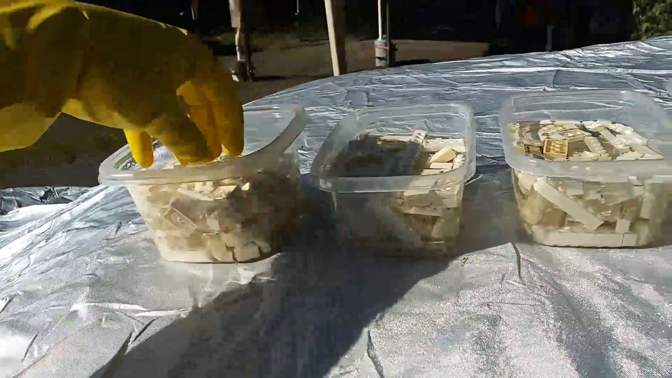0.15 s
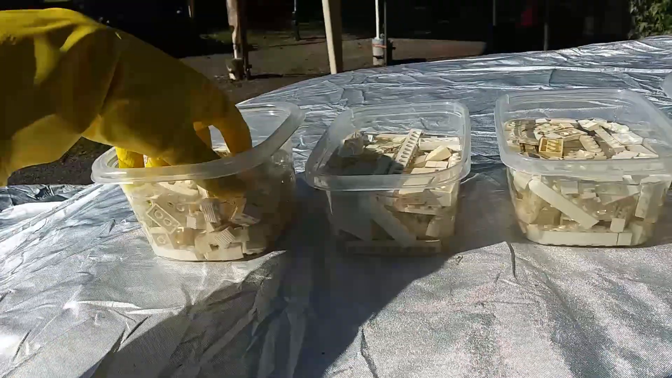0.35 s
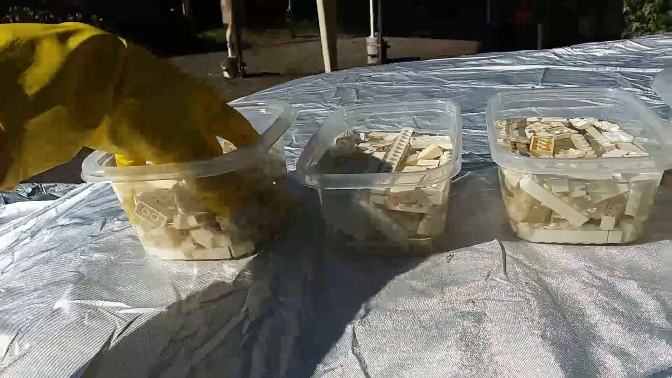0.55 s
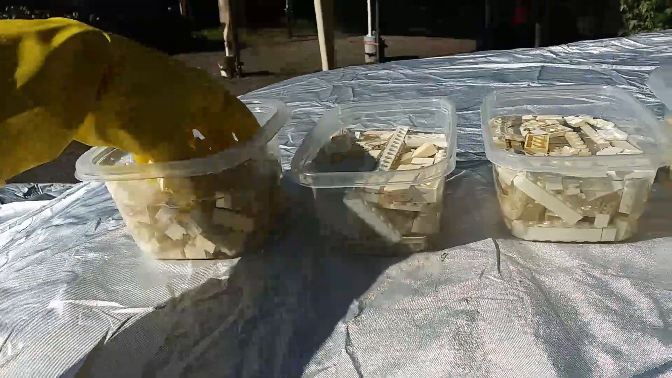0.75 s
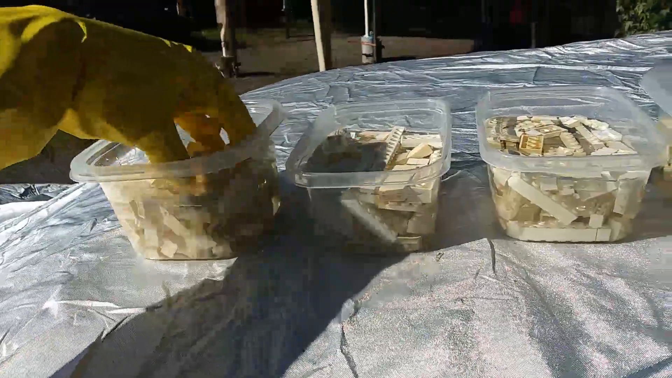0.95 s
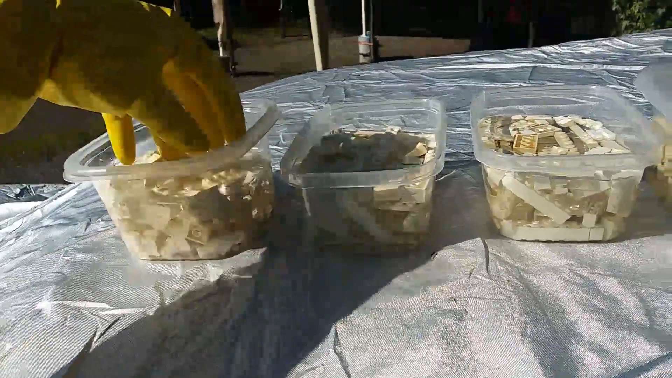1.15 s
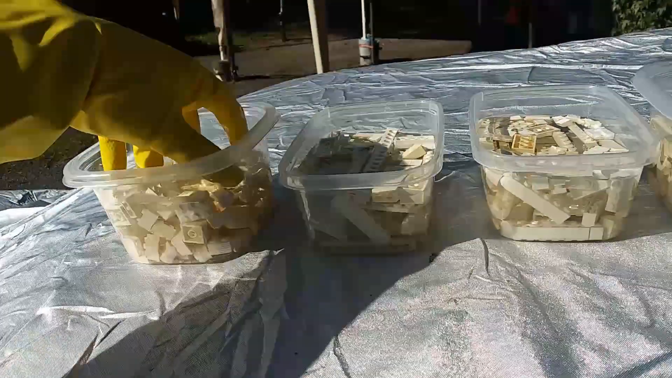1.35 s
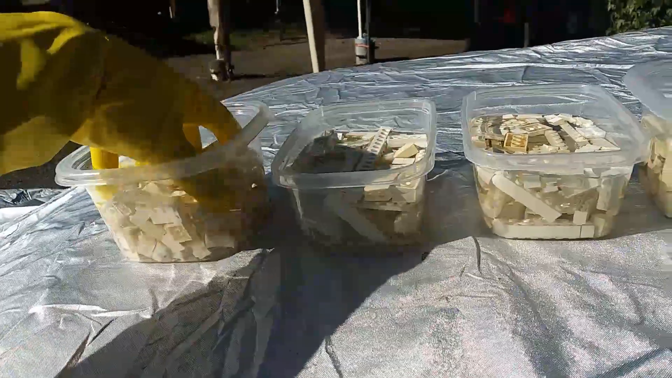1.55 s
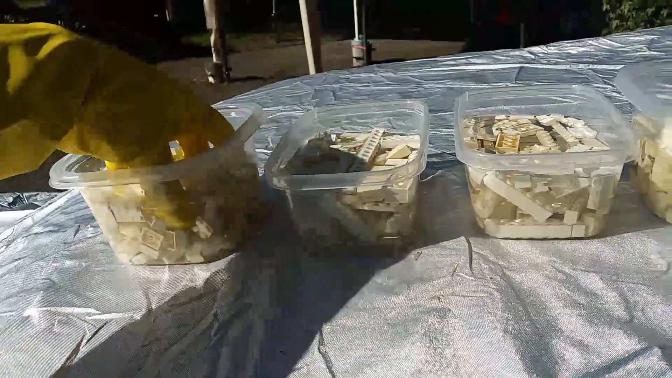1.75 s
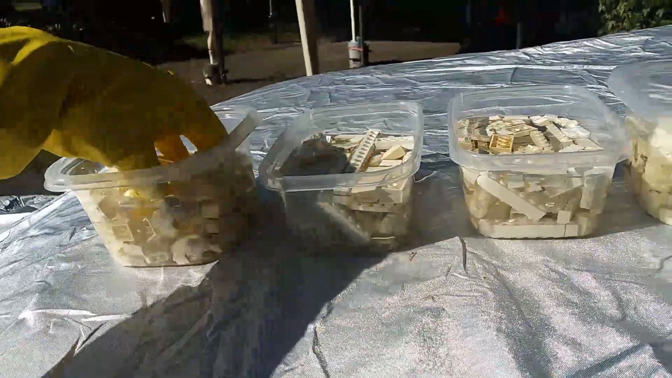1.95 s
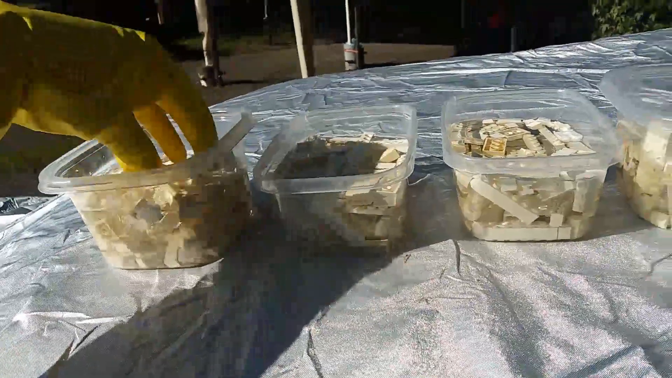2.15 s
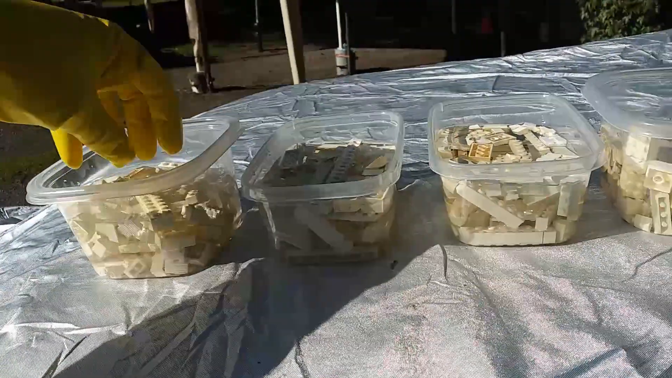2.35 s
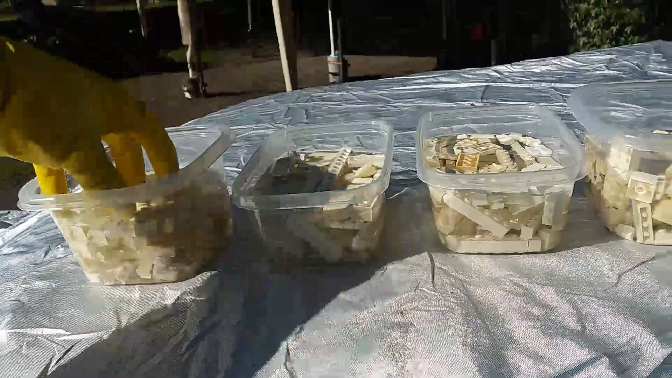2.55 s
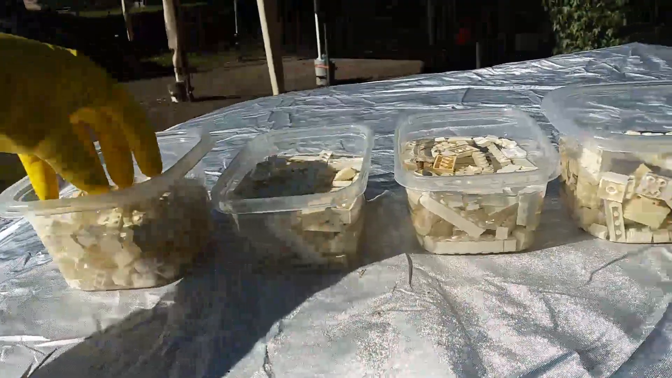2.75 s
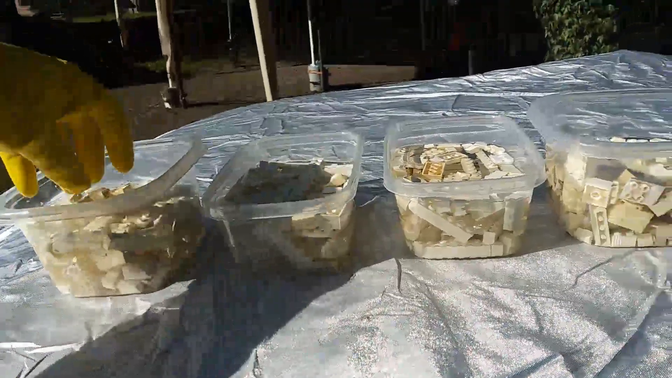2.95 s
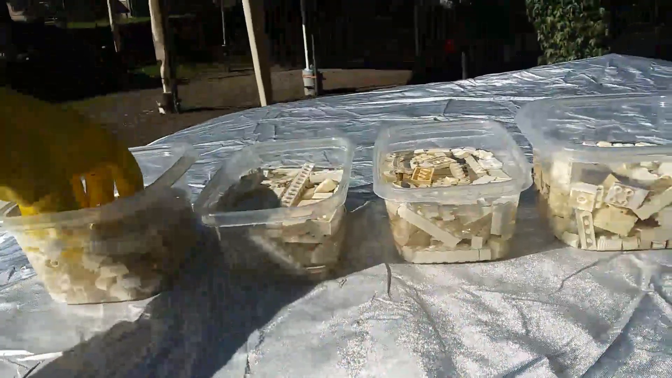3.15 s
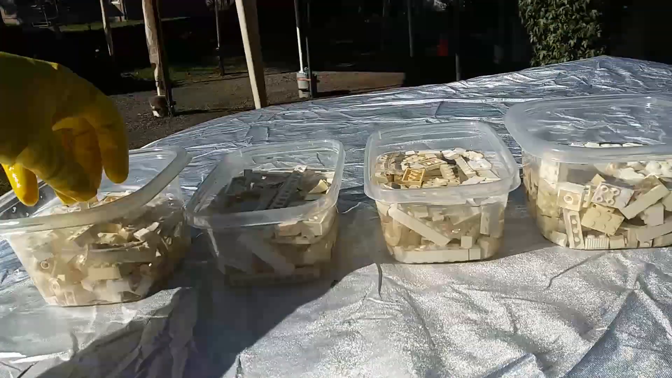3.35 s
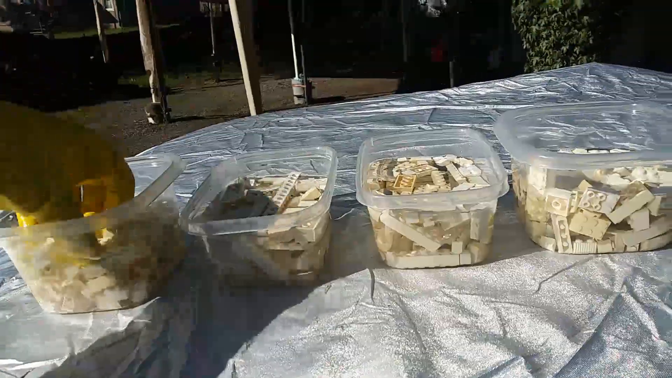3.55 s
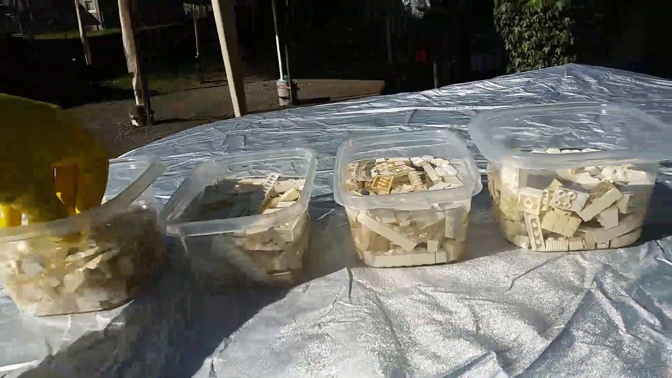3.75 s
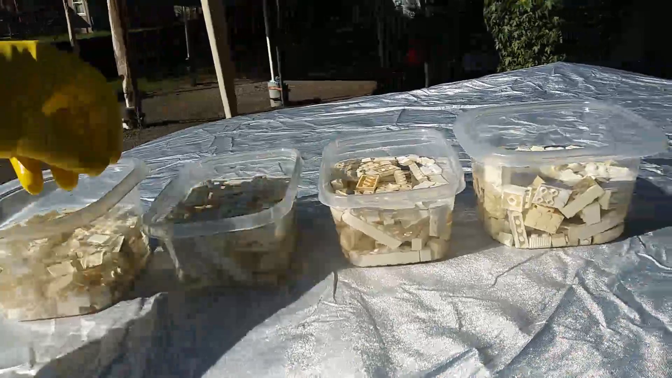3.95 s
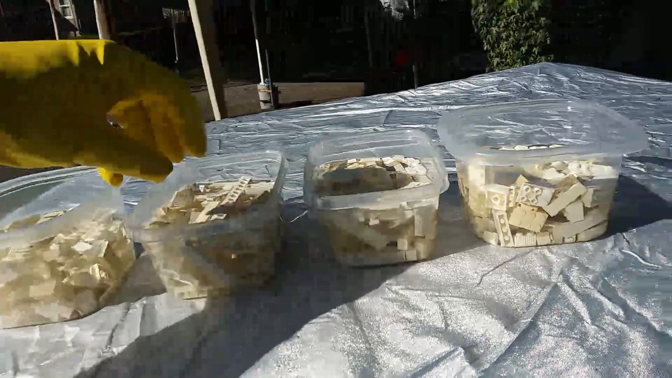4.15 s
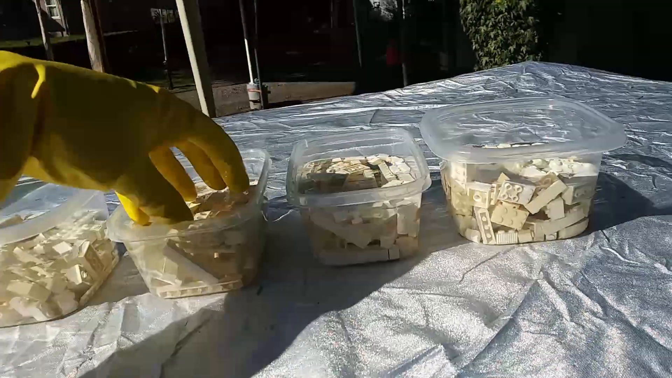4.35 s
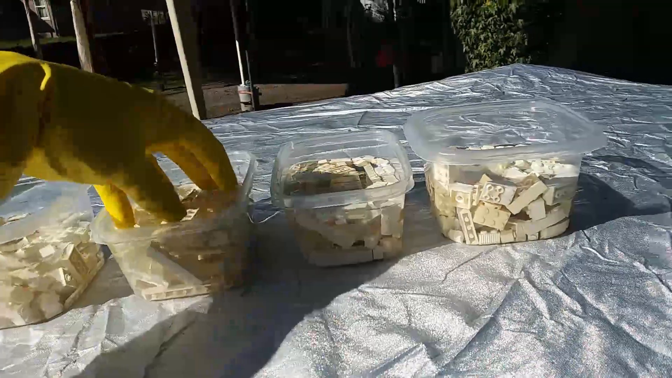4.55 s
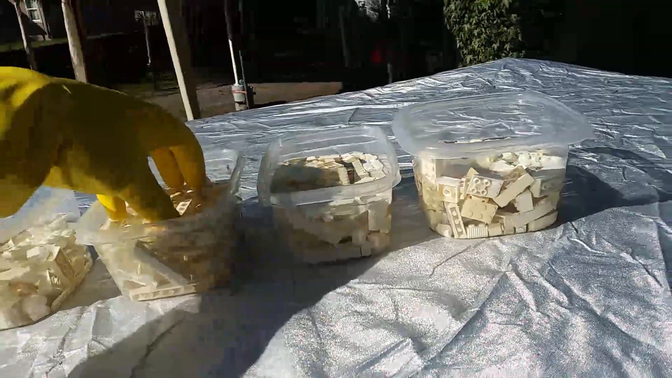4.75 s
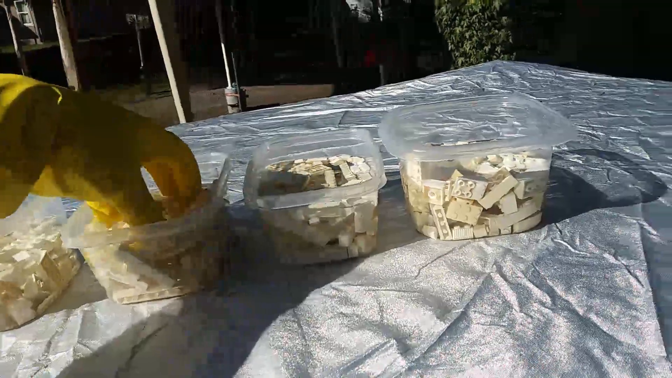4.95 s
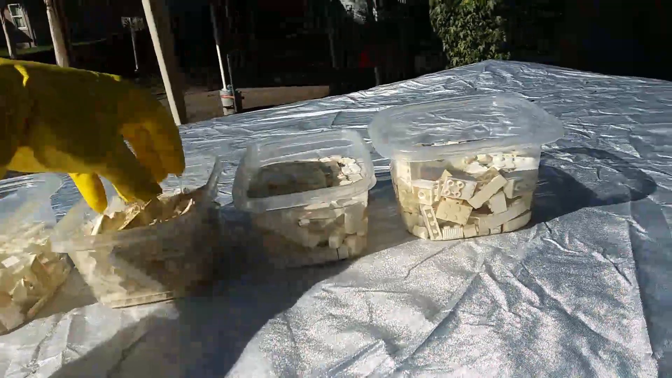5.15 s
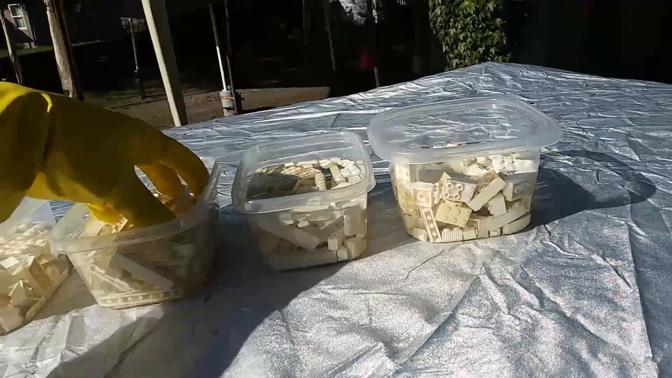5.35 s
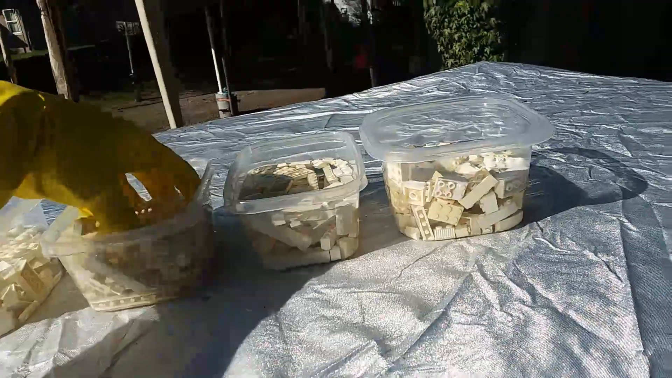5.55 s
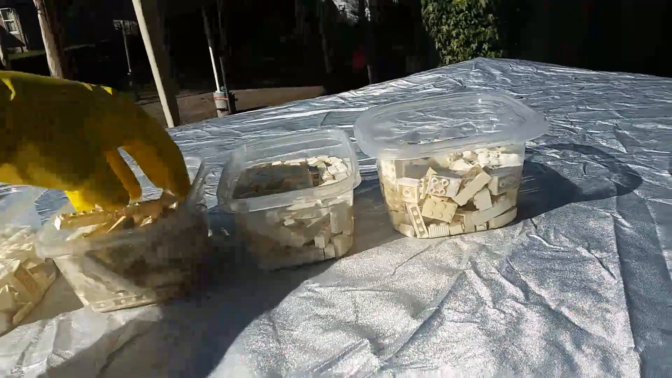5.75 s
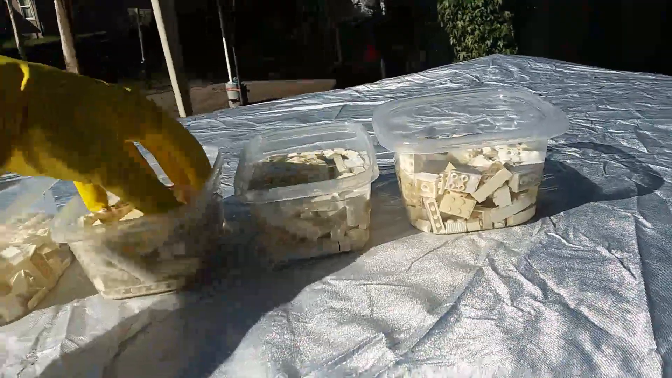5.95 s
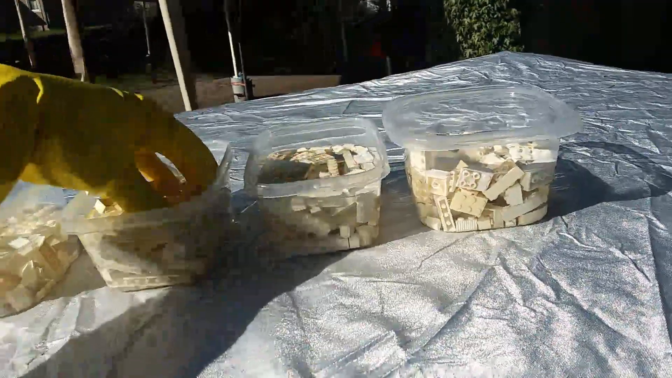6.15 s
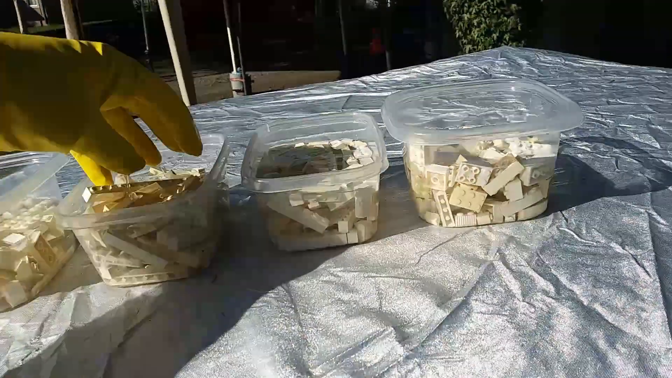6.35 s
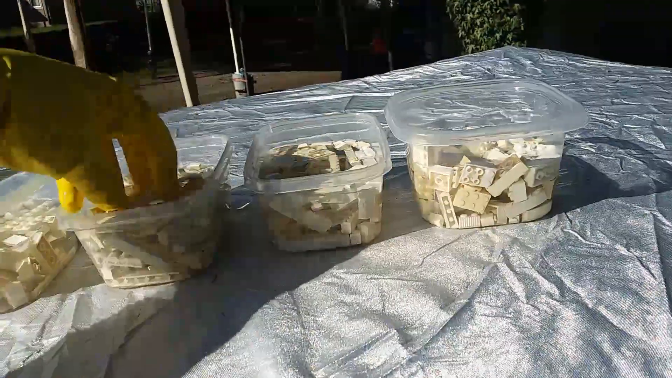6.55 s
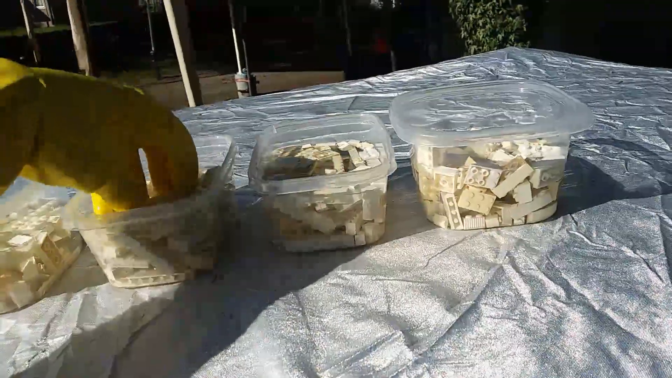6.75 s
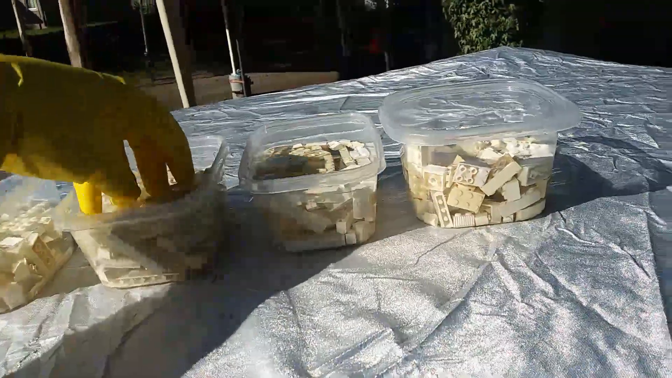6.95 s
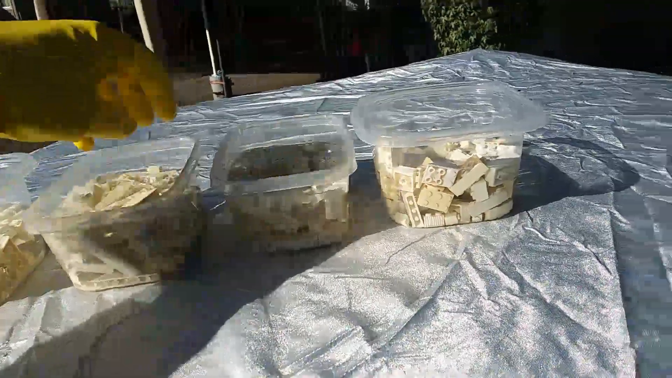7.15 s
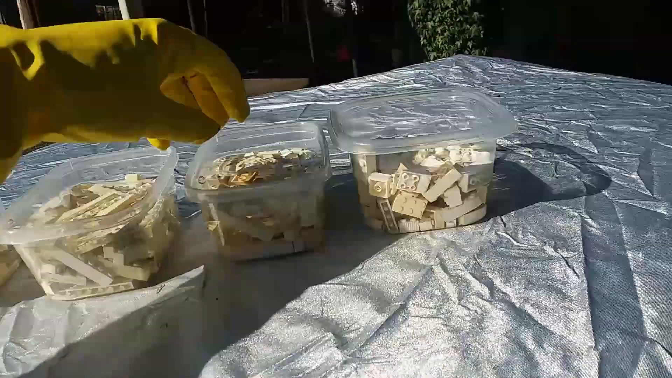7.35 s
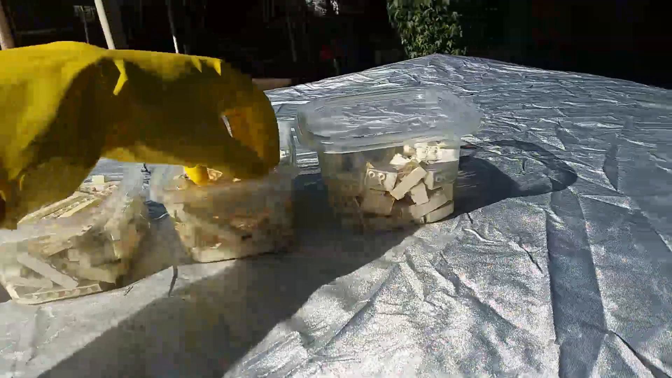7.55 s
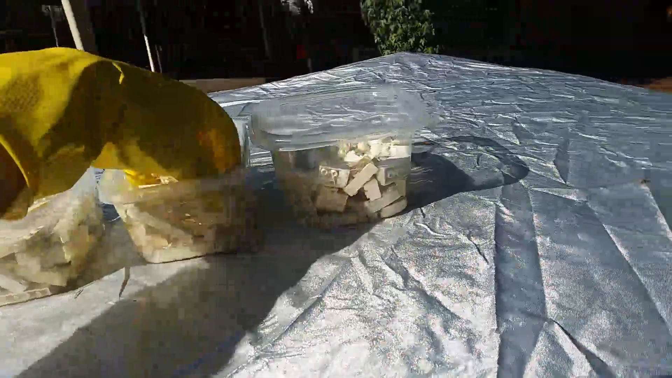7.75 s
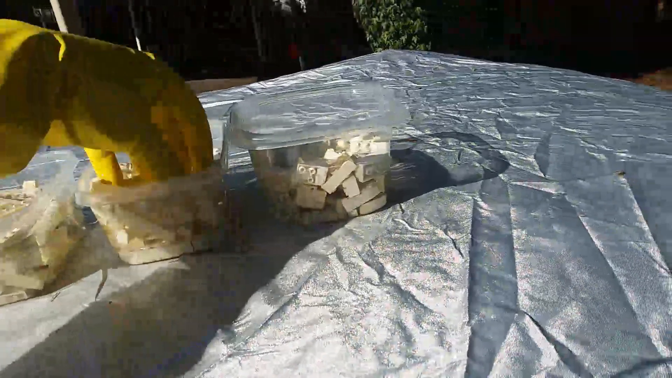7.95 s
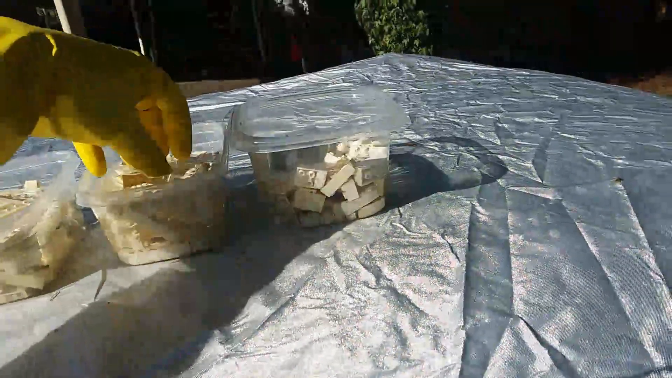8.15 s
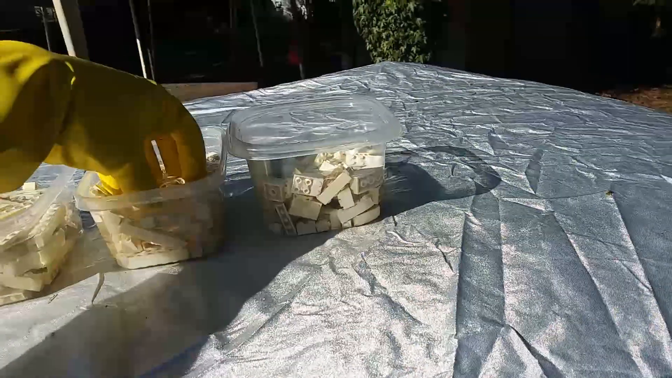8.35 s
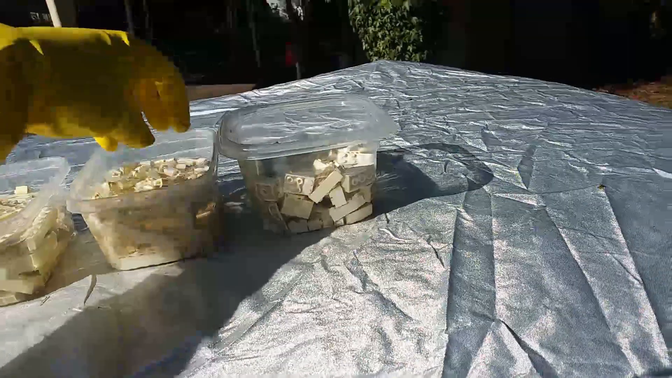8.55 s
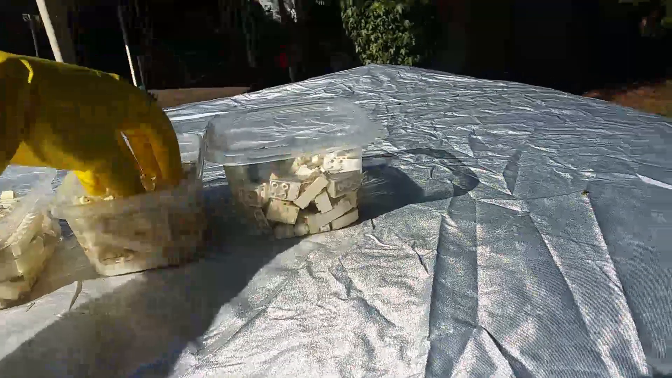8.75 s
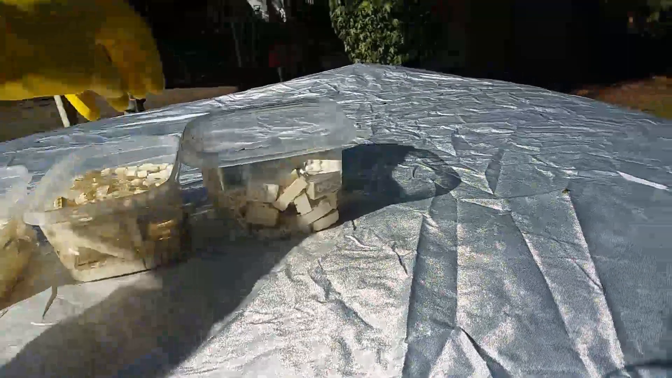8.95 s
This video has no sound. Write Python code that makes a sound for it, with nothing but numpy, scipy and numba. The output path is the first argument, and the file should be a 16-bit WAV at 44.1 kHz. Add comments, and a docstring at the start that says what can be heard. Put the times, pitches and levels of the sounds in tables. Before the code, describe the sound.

Outdoors, a close microphone picks up plastic bricks churning and knocking in a tub of liquid as a gloved hand presses them down again and again. Bubbles gurgle and trapped air spits between the pieces. The stirring stops for a moment of dripping and a barely audible distant bird, then resumes with a crisper clatter. After a second short lull with faint thin tones come the last pushes and a light swish of the sleeve.

```python
"""A table outdoors, a small microphone close to thin plastic tubs; far behind, a faint machine hum.
A rubber-gloved hand pushes small plastic bricks under the liquid: each push is a dense, damped clatter
with a few hard knocks, while bubbles gurgle, froth fizzes and trapped air spits out between the bricks.
Near 4 s the glove lifts, liquid drips and trickles back, and a far bird chirps. Crisper pushes follow in
another tub. Thin tones hang in the last pause, after 7 s; a few more pushes, and the sleeve swishes."""
import sys
import numpy as np
from scipy import signal
from scipy.fft import rfft, irfft
from scipy.io import wavfile
from scipy.ndimage import uniform_filter1d
from numba import njit

SR = 44100
rng = np.random.default_rng(int(sys.argv[2]) if len(sys.argv) > 2 else 0)


def file_out(sig):
    """Save sig as 16-bit WAV at sys.argv[1]."""
    # one column per channel
    cols = np.atleast_2d(sig).T
    # limit, then scale
    lim = np.clip(cols, -1, 1)
    pcm = np.round(lim * 32767).astype(np.int16)
    wavfile.write(sys.argv[1], SR, pcm)


N = 397334

# Single hard knocks of brick on brick or tub.
# Each row: start in seconds, peak in dB, main ring in Hz, hardness of the edge in dB.
KNOCKS = [(0.1, -25.5, 1213, -7), (0.192, -29, 1140, -20), (0.207, -23, 1090, -17.5),
          (0.232, -17, 1144, -17), (0.301, -22.5, 800, -22), (0.372, -27, 970, -12),
          (0.431, -23, 775, -13.5), (0.586, -19.5, 1040, -10), (0.668, -22.5, 1014, -17),
          (0.696, -22, 1186, -16), (0.952, -22.5, 1060, -10), (1.007, -23, 1224, -15.5),
          (1.038, -22.5, 1040, -10), (1.11, -26, 1045, -12), (1.173, -24, 1110, -3), (1.35, -19, 1090, -35),
          (1.36, -16.5, 946, -12), (1.399, -19, 890, -16), (1.517, -24, 905, -14), (1.543, -25.5, 925, -25),
          (1.589, -19, 840, -14), (1.629, -18, 1150, -6), (1.722, -20, 1180, -30), (1.794, -22, 1120, -14),
          (1.851, -19, 1360, -16.5), (1.863, -23, 1010, -6), (1.996, -22, 754, -14),
          (2.077, -25, 807, -15.5), (2.145, -21.5, 1100, -17), (2.219, -24.5, 1116, -17),
          (2.325, -37, 762, -17), (2.395, -43, 1130, -25), (2.474, -29, 1160, 2),
          (2.535, -17.5, 980, -16.5), (2.572, -21.5, 990, -16.5), (2.722, -28, 807, -22),
          (2.78, -28.5, 1070, -20), (2.889, -34, 1110, -23), (2.974, -25.5, 836, -18.5),
          (3.004, -17.5, 1160, -15), (3.035, -15.5, 854, -18), (3.051, -13.5, 973, -14.5),
          (3.059, -17.5, 707, -14), (3.199, -30, 1070, -17), (3.221, -30.5, 826, -13),
          (3.245, -29.5, 856, -18), (3.358, -32, 990, -23), (3.421, -24, 547, -13), (3.45, -21, 900, -26),
          (3.462, -16.5, 1030, -8), (3.482, -16, 977, -14), (3.498, -13, 974, -7),
          (3.522, -16.5, 1145, -14), (3.531, -17.5, 1020, -3), (3.623, -28, 1010, -9),
          (3.672, -27.5, 910, -16.5), (3.733, -32.5, 780, -16), (3.786, -32.5, 845, -18),
          (3.843, -36.5, 940, -15.5), (3.892, -33.5, 784, -28), (3.929, -38, 950, -24),
          (4.043, -38, 883, -28), (4.394, -46, 1070, -10), (4.461, -41, 746, -1), (4.706, -35, 764, -8),
          (4.731, -19, 868, -13.5), (4.754, -19, 1296, -7), (4.786, -21, 726, -2), (4.829, -25, 760, -16),
          (4.88, -21, 513, -15), (4.959, -27, 900, -11), (4.965, -20.5, 2490, -5),
          (4.989, -24.5, 533, -14.5), (5.054, -26, 1190, -10), (5.088, -21.5, 1260, -7),
          (5.128, -24, 704, -27.5), (5.254, -25, 1140, -12), (5.261, -15, 1220, -8),
          (5.296, -21, 1300, -10), (5.317, -19.5, 1155, -10), (5.417, -24, 845, -17),
          (5.491, -19, 965, -18), (5.521, -13, 1090, 0), (5.539, -16, 1110, -15.5),
          (5.624, -19.5, 870, -11), (5.82, -30.5, 943, -24), (5.908, -22.5, 900, -5),
          (5.955, -19, 860, -10), (6.013, -21, 950, -13), (6.091, -24.5, 960, -10), (6.154, -32, 880, -15),
          (6.193, -24.5, 860, -15), (6.251, -34, 900, -31), (6.359, -31.5, 970, -22),
          (6.515, -15.5, 913, -15.5), (6.535, -17.5, 820, -1), (6.603, -18.5, 950, -4),
          (6.681, -25.5, 915, -16), (6.739, -27, 935, -22), (6.863, -33.5, 1330, -14),
          (6.877, -32, 990, -11), (6.929, -36, 1150, -16), (7.009, -38, 815, -26), (7.572, -23.5, 1324, -7),
          (7.589, -21.5, 754, -20), (7.672, -22.5, 1090, -15), (7.73, -27, 1080, -20),
          (7.759, -26, 1040, -22), (7.861, -26, 770, -21), (7.95, -22, 1060, -12), (8.213, -21, 1466, -13),
          (8.244, -24.5, 780, -6), (8.29, -24.5, 950, -8), (8.528, -45, 1464, -18), (8.663, -22, 1013, -14),
          (8.677, -24.5, 1105, -22), (8.956, -38.5, 1980, -9), (8.998, -39, 1510, -10)]


def from_db(db):
    """Decibels to amplitude."""
    return 10 ** (np.asarray(db) / 20)


def rms_one(x):
    """The signal scaled to rms 1."""
    return x / np.sqrt(np.mean(x ** 2) + 1e-20)


def in_time(rows):
    """Each column of a curve at every sample; the first column is seconds."""
    s, *columns = np.transpose(rows)
    return [np.interp(np.arange(N) / SR, np.maximum.accumulate(s), c) for c in columns]


def add(out, s, sound):
    """Mix a short sound in at s seconds."""
    start = int(np.clip(round(s * SR), 0, N - 1))
    out[start:start + len(sound)] += sound[:N - start]


def drift(per_s):
    """A random wander of rms 1, turning per_s times a second."""
    knots = rng.standard_normal(N // 20)
    return rms_one(np.interp(np.arange(N) / SR * per_s, np.arange(len(knots)), knots))


def band(x, low_hz, high_hz, order=3):
    """Band-pass filter."""
    edges_hz = [low_hz, min(high_hz, SR / 2 - 100)]
    return signal.sosfilt(signal.butter(order, edges_hz, "band", fs=SR, output="sos"), x)


def narrow_noise(hz, width_hz):
    """A wavering tone: noise in a narrow band, rms 1."""
    return rms_one(band(rng.standard_normal(N), hz - width_hz / 2, hz + width_hz / 2, order=2))


def response(spectrum, lifts=(), size=4096):
    """Causal (minimum-phase) impulse response of a spectrum with resonant lifts."""
    hz = np.maximum(np.fft.rfftfreq(size, 1 / SR), 1)
    points = np.array(spectrum)
    db = np.interp(np.log(hz), np.log(points[:, 0]), points[:, 1])
    db = db + sum(lift * np.exp(-((hz - centre) / width) ** 2) for centre, width, lift in lifts)
    cepstrum = irfft(np.log(from_db(db)))
    cepstrum[1:size // 2] *= 2
    cepstrum[size // 2 + 1:] = 0
    return irfft(np.exp(rfft(cepstrum)))


def through(x, impulse):
    """Pass a sound through an impulse response, keeping its length."""
    return signal.oaconvolve(x, impulse)[:len(x)]


def evened(x, span_s):
    """Level near 1 over each span; the grain inside it stays."""
    size = int(span_s * SR)
    power = uniform_filter1d(uniform_filter1d(x ** 2, size), size)
    return x / np.sqrt(np.abs(power) + np.mean(x ** 2) / 1000)


def contacts(per_s, spread_db):
    """Random clicks, most of them small and a few large."""
    sizes = from_db(spread_db * np.minimum(rng.exponential(1, N), 4))
    return sizes * (rng.random(N) < per_s / SR)


@njit
def damped_modes(starts, turn, keep, height, length):
    """Sum of decaying sines, each given by start sample, radians and decay per sample, and height."""
    out = np.zeros(length)
    for k in range(len(starts)):
        spring, loss = 2 * keep[k] * np.cos(turn[k]), keep[k] * keep[k]
        before, now = 0.0, height[k] * np.sin(turn[k])
        for i in range(starts[k], min(length, starts[k] + int(5 / (1 - keep[k])))):
            out[i] += now
            before, now = now, spring * now - loss * before
    return out


def still_air(level_db=-66):
    """The garden's steady bed of soft, low noise."""
    # Colour of the air. Each row: frequency in Hz, level in dB.
    colour = [(25, -46), (85, -28), (140, -6), (200, -3.5), (255, -6), (330, -9), (520, -17), (850, -23.5),
              (1100, -20), (1600, -11), (2700, -30), (4800, -34), (6500, -43), (12000, -42), (15000, -52)]
    return from_db(level_db) * rms_one(through(rng.standard_normal(N), response(colour)))


def far_machine(waver_db=0.5):
    """A distant machine hums in narrow, low bands, swelling and fading."""
    # Bands of the hum. Each row: centre in Hz, width in Hz, level in dB.
    hum_bands = [(120.7, 5.1, -84), (182, 33, -79.5), (248.4, 56, -67.5)]
    # Swell of the hum. Each row: time in seconds, gain in dB.
    swell = [(0, 2.5), (4.3, -0.5), (4.6, 5), (7.3, 5), (8.7, -0.5), (8.85, -1)]
    gain = from_db(in_time(swell)[0] + waver_db * drift(7))
    return gain * sum(from_db(db) * narrow_noise(hz, width) for hz, width, db in hum_bands)


def far_bird(waver_hz=190):
    """A small bird, well off the microphone: short, high whistles that waver as they fall."""
    # The calls. Each row: start and length in seconds, first and last pitch in Hz, peak in dB.
    chirps = [(4.423, .022, 7300, 6250, -76), (4.46, 0.043, 6600, 6300, -73),
              (4.576, 0.043, 7060, 6700, -76), (4.642, 0.05, 6730, 6370, -73)]
    out = np.zeros(N)
    waver = waver_hz * drift(700)
    for s, length, start_hz, end_hz, db in chirps:
        size = int(length * SR)
        glide = np.linspace(start_hz, end_hz, size) + waver[int(s * SR):][:size]
        add(out, s, from_db(db) * np.hanning(size) * np.sin(2 * np.pi * np.cumsum(glide) / SR))
    return out


def thin_tones(fade_s=0.036, skirt_db=-7.0, skirt_ratio=3.1):
    """Faint, rough whistles that waver in a narrow band and fade in and out."""
    # The whistles. Each row: start and end in seconds, pitch and width in Hz, level in dB.
    tones = [(7.13, 7.535, 4345, 100, -72.5), (7.04, 7.51, 1825, 106, -64), (6.5, 7.42, 2255, 35, -78)]
    out, t = np.zeros(N), np.arange(N) / SR
    for start, end, hz, width_hz, db in tones:
        fade = np.clip(np.minimum(t - start, end - t) / fade_s, 0, 1)
        core = narrow_noise(hz, width_hz)
        skirt = from_db(skirt_db) * narrow_noise(hz, skirt_ratio * width_hz)
        out += from_db(db) * fade * (core + skirt)
    return out


def table_echo(x, t60=0.17, wet_db=-13.0, dull_hz=3800, size=10000):
    """The direct sound plus the short, dull tail thrown back by the table and neighbouring tubs."""
    t = np.arange(size) / SR
    decay = from_db(-60 * t / t60) * (t > .003)
    tail = band(rng.standard_normal(size) * decay, 200, dull_hz, order=2)
    return x + from_db(wet_db) * through(x, tail / np.linalg.norm(tail) * np.sqrt(2 * dull_hz / SR))


def swishes(low_hz=1050, high_hz=4600, tilt_hz=1800):
    """Glove and sleeve rub softly as the arm moves away."""
    # Arm movements. Each row: middle and half length in seconds, level in dB.
    moves = [(4.484, 0.042, -68), (8.923, 0.11, -50.5)]
    t = np.arange(N) / SR
    rub = band(rng.standard_normal(N), low_hz, high_hz, order=8)
    rub = signal.sosfilt(signal.butter(1, tilt_hz, fs=SR, output="sos"), rub)
    return rms_one(rub) * sum(from_db(db) * np.exp(-((t - s) / half) ** 2) for s, half, db in moves)


def fizz(level_db, pops_per_s=2600, spread_db=6.5, pop_s=0.0008, clump_db=4.0, size=400):
    """Froth crackles as the bricks churn it: each tiny bubble bursts in about a millisecond."""
    # Colour of the bursting froth. Each row: frequency in Hz, level in dB.
    colour = [(2500, -26.5), (4200, 7), (5300, 7), (6100, -12.5), (7200, -12), (8000, -20.5), (10500, -20),
              (14000, -22.5), (15500, -28.5)]
    # Froth, thickest in the first long stir. Each row: time in seconds, dB relative to level_db.
    froth = [(0, -30.5), (1.1, -32.5), (1.8, -27.5), (2.2, -26), (2.45, -43.5), (4.3, -35.5), (9, -34)]
    bursts = contacts(pops_per_s * from_db(clump_db * drift(25)), spread_db)
    pops = through(bursts, np.exp(-np.arange(size) / SR / pop_s)) * rng.standard_normal(N)
    return from_db(level_db + in_time(froth)[0]) * rms_one(through(pops, response(colour)))


def spits(half_width_hz=170, swell=0.093, droplets_per_s=1300, spread_db=9.0, burst_s=0.0016, size=6000):
    """Air spits out between wet bricks in bursts of fine spray; each gap whistles at its own pitch."""
    # Escapes of air. Each row: start and length in seconds, spray in dB, whistle in Hz, whistle in dB.
    escapes = [(1.144, 0.005, -53, 7070, -58), (1.163, 0.03, -48.5, 7020, -57),
               (1.752, 0.035, -49, 6500, -57), (1.852, 0.016, -43.5, 10200, -58),
               (3.469, 0.061, -51, 6640, -54), (4.726, 0.024, -51.5, 6360, -58),
               (4.783, .015, -55, 6470, -61), (5.292, 0.046, -50.5, 6640, -58),
               (5.491, .06, -60, 6570, -68), (5.898, 0.056, -67, 6760, -65),
               (5.978, 0.016, -36.5, 6570, -45), (6.07, 0.009, -44.5, 10600, -61),
               (6.348, 0.0072, -64, 6600, -53), (6.514, 0.0099, -55, 6350, -49),
               (6.53, 0.022, -35, 6530, -44), (6.601, 0.0071, -49, 6400, -60),
               (6.699, 0.0073, -62, 6900, -57), (7.561, 0.037, -48.5, 6700, -59),
               (7.912, 0.058, -47.5, 6300, -52), (7.925, 0.016, -63, 6970, -42),
               (8.179, 0.011, -60, 6710, -57), (8.637, 0.016, -55, 6440, -53)]
    # Colour of the spray. Each row: frequency in Hz, level in dB.
    colour = [(2500, -24), (5000, 5.5), (7000, -5), (7900, -12.5), (10000, -10), (12000, -15), (15000, -31)]
    out, t = np.zeros(N), np.arange(size) / SR
    bursts = through(contacts(droplets_per_s, spread_db), np.exp(-t / burst_s))
    spray = evened(through(bursts * rng.standard_normal(N), response(colour)), span_s=0.03)
    for s, length, spray_db, hz, whistle_db in escapes:
        gate = (1 - np.exp(-t / (swell * length))) * np.exp(-(t / length) ** 3)
        gap = band(rng.standard_normal(2 * size), hz - half_width_hz, hz + half_width_hz, order=2)
        whistle = from_db(whistle_db) * rms_one(gap[size:])
        add(out, s, gate * (from_db(spray_db) * spray[int(s * SR):][:size] + whistle))
    return out


def bubble(hz, t60, rise=0.0067):
    """A bubble rings briefly and rises in pitch as it nears the surface."""
    t = np.arange(int(t60 * SR)) / SR
    ring = np.sin(2 * np.pi * hz * t * (1 + rise * t / t60))
    return ring * from_db(-60 * t / t60) * (1 - np.exp(-t * hz))


def trickle(octaves=0.21, cycles=24.2, spread_db=2.5, count=400):
    """Small bubbles of scattered pitch, as liquid runs off the glove and drains between the bricks."""
    # Runs of liquid. Each row: start and length in seconds, bubbles per second,
    # level of a typical bubble in dB, middle pitch in Hz.
    runs = [(3.6, 0.26, 260, -58.5, 4170), (3.868, 0.13, 150, -43, 974), (4.079, 0.082, 300, -42, 910),
            (4.084, 0.08, 530, -59, 2430), (4.199, 0.35, 380, -47, 910), (4.201, 0.44, 55, -48.5, 560),
            (4.262, .1, 380, -59, 1920), (4.395, 0.11, 560, -58.5, 2280), (4.482, 0.17, 260, -51.5, 1330),
            (4.473, 0.072, 200, -52.5, 370), (7.073, 0.073, 400, -55, 1450), (7.223, 0.087, 280, -52, 1330),
            (7.253, .09, 90, -51.5, 362), (8.33, 0.27, 300, -59, 4070), (8.45, 0.16, 400, -44.5, 1425),
            (8.688, 0.081, 380, -47, 584)]
    out = np.zeros(N)
    for start, length, per_s, db, middle_hz in runs:
        draws = np.column_stack([rng.random(count), rng.standard_normal((count, 2)).clip(-2, 2)])
        for when, pitch, loudness in draws[:int(per_s * length)]:
            hz = middle_hz * 2 ** (octaves * pitch)
            add(out, start + when * length, from_db(db + spread_db * loudness) * bubble(hz, cycles / hz))
    return out


def bubbles(clatter_db, above_db=0.5, spread_db=3.4, centre_hz=1020, octaves=0.19, cycles=34, count=300):
    """Air freed from the hollow bricks bubbles up all through the stirring; a few drips stand out."""
    # Single drips and gulps. Each row: start in seconds, level in dB, pitch in Hz, t60 in seconds.
    drips = [(0.666, -20, 2620, 0.016), (0.953, -25.5, 4500, 0.03), (2.542, -22.5, 2200, 0.023),
             (2.724, -32.5, 2510, 0.032), (3.404, -32.5, 200, .09), (3.469, -27, 4170, 0.059),
             (3.852, -53, 1970, .07), (3.868, -45, 1970, 0.059), (3.929, -46, 1930, 0.054),
             (3.961, -42, 880, 0.046), (4.004, -43.5, 960, 0.074), (4.042, -46, 1410, .045),
             (4.04, -65.5, 4100, 0.035), (4.063, -28.5, 847, 0.045), (4.064, -65, 3470, .08),
             (4.111, -40, 970, 0.06), (4.134, -40, 1080, .03), (4.143, -59, 2700, 0.061),
             (4.158, -59, 2450, .06), (4.207, -44, 850, 0.05), (4.228, -41, 775, 0.044),
             (4.327, -51, 1980, 0.044), (4.344, -41, 1130, 0.046), (4.394, -47, 2180, 0.032),
             (4.395, -56, 2480, .15), (4.436, -48, 1440, .06), (4.461, -43, 1910, 0.037),
             (4.522, -43, 755, 0.066), (4.638, -47, 1120, 0.04), (4.968, -31, 2550, 0.016),
             (5.033, -31, 2530, 0.057), (5.088, -25, 4140, 0.015), (5.26, -19.5, 1570, 0.022),
             (7.273, -46.5, 1117, 0.062), (7.335, -53, 970, 0.054), (7.407, -51.5, 1780, 0.062),
             (8.352, -40, 2640, 0.055), (8.462, -46, 4300, 0.036), (8.587, -42, 957, 0.082)]
    out = np.zeros(N)
    starts = rng.integers(0, N, count)
    for at, pitch, loudness in zip(starts, *rng.standard_normal((2, count)).clip(-2, 2)):
        hz = centre_hz * 2 ** (octaves * pitch)
        db = clatter_db[at] + above_db + spread_db * loudness
        add(out, at / SR, from_db(db) * bubble(hz, cycles / hz))
    for s, db, hz, t60 in drips:
        add(out, s, from_db(db) * bubble(hz, t60))
    return out


def filled_tub():
    """Impulse response of the tub with its liquid and bricks."""
    # Colour of the filled tub. Each row: frequency in Hz, level in dB.
    colour = [(80, -36.5), (130, -36.5), (200, -20.5), (300, -14.5), (520, -0.5), (820, 2), (1150, 3),
              (1650, -11.5), (3200, -15.5), (4900, -22), (5900, -46.5), (8000, -55.5), (10500, -53),
              (15000, -67.5)]
    # Resonances of the tub wall and the bricks. Each row: centre in Hz, width in Hz, lift in dB.
    resonances = [(220, 36, 2), (277.5, 23, 4.5), (1934, 100, 4), (2450, 284, 3.5), (4280, 300, 3.5),
                  (6720, 340, 12.5)]
    return response(colour, resonances)


def hand(rise_power=0.88, slosh_db=-14.5, calming_db_per_s=44, still_s=1.0):
    """Each push swells, holds and settles, leaving a slow slosh. Gives clatter, thud and edge in dB."""
    # The hand pushes the bricks under or lets them rise. Each row: start in seconds, clatter in dB,
    # rise and hold in seconds, settling in dB per second, then thud of the tub floor and edge of the
    # bricks above the liquid, both in dB relative to the clatter.
    pushes = [(0.0, -34.5, 0.00067, 0.004, 55, -15.5, -7), (0.176, -30, 0.08, 0.082, 46, -18.5, -7),
              (0.42, -29.5, 0.099, 0.19, 77, -16, -6.5), (0.755, -35.0, 0.035, 0.2, 26, -17, -5.5),
              (0.994, -34.5, 0.034, 0.0081, 116, -15, -9.5), (1.145, -29.5, 0.039, 0.005, 173, -18, -3.5),
              (1.239, -30.5, 0.02, 0.0056, 51, -21, -8), (1.314, -28.5, 0.049, 0.029, 305, -16.5, -5.5),
              (1.441, -28, 0.17, 0.15, 44.5, -17.5, -5.5), (1.833, -36.5, 0.022, 0.0079, 30, -12.5, -10.5),
              (2.456, -27.5, 0.1, 0.0063, 108.5, -16, -7.5), (2.668, -39, 0.053, 0.013, 87, -15, -6.5),
              (2.821, -40.5, 0.072, 0.022, 218.0, -24, -12.5), (2.967, -28.5, 0.05, 0.055, 84, -15, -6),
              (3.295, -42, 0.023, 0.011, 81, -11, -7.5), (3.409, -31.5, 0.008, 0.0046, 260, -7, -7.5),
              (3.448, -24, 0.023, 0.04, 170, -19.5, -6), (3.573, -42.5, 0.046, 0.11, 49, -14.5, -7.5),
              (4.38, -56, 0.026, 0.11, 66, -23, -10.5), (4.699, -31.5, 0.031, 0.03, 72, -6.5, -6.5),
              (4.954, -34.5, 0.0069, 0.0022, 53, -11.5, -6.5), (5.07, -41, 0.009, 0.11, 232, -6, -6),
              (5.239, -28, 0.042, 0.04, 280, -10, -6), (5.394, -34, 0.032, 0.031, 141, -10.5, -7),
              (5.48, -27.5, 0.014, 0.011, 63, -11.5, -6.5), (5.666, -40, 0.0057, 0.061, 46, -7, -8.5),
              (5.844, -29.5, 0.13, 0.04, 205, -10.5, -6.5), (6.041, -36.5, 0.048, 0.064, 66, -17, -7.5),
              (6.341, -41, 0.023, 0.016, 292, -8, -6), (6.496, -30.5, 0.034, 0.037, 93, -11.5, -6.5),
              (6.665, -37, 0.015, 0.012, 197.0, -7, -7.5), (6.78, -43, 0.03, 0.19, 148, -15.5, -10),
              (7.542, -34.5, 0.053, 0.032, 69.5, -8, -5.5), (7.722, -42, 0.008, 0.0086, 335.0, 10, -8),
              (7.833, -34.5, 0.052, 0.063, 95, -11.5, -4), (8.11, -37, 0.096, 0.078, 114, -7.5, -4.5),
              (8.372, -52, 0.017, 0.027, 61, -7, -4), (8.604, -35, 0.066, 0.0023, 191, -17.5, -4.5),
              (8.733, -50, 0.026, 0.099, 75, -33, -5.5)]
    t = np.arange(0, N, 32) / SR
    start, peak_db, rise_s, hold_s, settling, thud_db, edge_db = np.transpose(pushes)[:, :, None]
    swell = from_db(peak_db) * np.clip((t - start) / np.maximum(rise_s, 1 / SR), 0, 1) ** rise_power
    since = np.maximum(t - start - rise_s - hold_s, 0)
    push = (swell * from_db(-settling * since)) ** 2
    slosh = (swell * from_db(slosh_db - calming_db_per_s * since)) ** 2
    slosh *= np.maximum(1 - since / still_s, 0)
    power = (push + slosh).sum(axis=0) + 1e-12
    # the rocking liquid has 6 dB more thud and 6 dB less edge than its push
    thud = (push * thud_db + slosh * (thud_db + 6)).sum(axis=0) / power
    edge = (push * edge_db + slosh * (edge_db - 6)).sum(axis=0) / power
    return in_time(np.column_stack([t, 10 * np.log10(power), thud, edge]))


def glove_lifts(fade_s=0.045):
    """Share 0-1 by which the glove is clear of the liquid, and the change of the slosh in dB."""
    # Spells when the bricks only float. Each row: start and end in seconds, change of the slosh in dB.
    lifts = [(2.323, 2.465, 5), (3.933, 4.375, -6.5), (4.554, 4.684, 0), (7.078, 7.524, -5.5)]
    t = np.arange(N) / SR
    clear = [np.clip(np.minimum(t - start, end - t) / fade_s + .5, 0, 1) for start, end, _ in lifts]
    return sum(clear), sum(share * db for share, (_, _, db) in zip(clear, lifts))


def jams(jam_s=.011, dip_db=-2.5):
    """Dip of the clatter in dB while the heap sticks, before it gives way with a knock."""
    out = np.zeros(N)
    for s, *_ in KNOCKS:
        add(out, s - jam_s, signal.windows.tukey(int(jam_s * SR), .5))
    return dip_db * np.minimum(out, 1)


def brick_rings(per_s, t60, spread_db, uneven_db, count=26000, modes=7):
    """No two bricks ring alike: every contact has short, wet modes of its own, about one an octave."""
    at = rng.integers(0, N, count)
    happens = rng.random(count) < per_s[at] * N / SR / count
    pitch, strength, sign = rng.random((3, count, modes))[:, happens]
    force, damping = rng.random((2, count, 1))[:, happens]
    hz = 160 * 90 ** ((np.arange(modes) + pitch) / modes)
    decay_s = t60[at[happens], None] * (hz / 1000) ** -.45 * 2 ** (2 * damping - 1)
    force_db = spread_db * np.minimum(-np.log(1 - force), 3.6)
    mode_db = force_db + uneven_db * (2 * strength - 1)
    height = np.sign(sign - .5) * from_db(mode_db) * np.sqrt(hz / decay_s)
    turn, keep = 2 * np.pi * hz / SR, from_db(-60 / (decay_s * SR))
    return damped_modes(np.repeat(at[happens], modes), turn.ravel(), keep.ravel(), height.ravel(), N)


def ticks(surface_db, tub, per_s=110, relative_db=-22, low_hz=3800, high_hz=9000):
    """Corners of bricks catch on each other: sharp clicks that stand out of the clatter."""
    clicks = contacts(per_s, spread_db=11.5) * rng.choice([-1, 1], N)
    sharp = band(through(clicks, tub), low_hz, high_hz, order=2)
    return from_db(surface_db + relative_db) * rms_one(sharp)


def clacks(surface_db, tub, per_s=55, relative_db=-11, t60=0.06, low_hz=1500, high_hz=4900):
    """Loose bricks at the surface are struck free and ring briefly at pitches of their own."""
    rings = brick_rings(np.full(N, per_s), np.full(N, t60), spread_db=2.0, uneven_db=6.0)
    bright = band(through(rings, tub), low_hz, high_hz, order=4)
    return from_db(surface_db + relative_db) * rms_one(bright)


def knocks(tub, t60=0.046, ring_t60=0.035, ring_db=2.0, submerged_edge_db=-18.0, muffled_hz=2700,
           rock_s=0.009, rock_db=-10.5, size=2000, count=40):
    """A knock rings one main mode over many weak ones; dry bricks give it a harder edge."""
    out, t = np.zeros(N), np.arange(size) / SR
    for s, peak_db, ring_hz, edge_db in KNOCKS:
        hz = 200 * 50 ** ((np.arange(count) + rng.random(count)) / count)
        hard_db = 2.6 * np.minimum(edge_db - submerged_edge_db, 6) * (hz > 1700)
        # a deep knock loses its top
        muffle_db = min(edge_db + 11.5, 0) * np.log2(np.maximum(hz / muffled_hz, 1))
        height = rng.choice([-1, 1], count) * np.sqrt(hz) * from_db(hard_db + muffle_db)
        keep = from_db(-60 / (t60 * (hz / 1000) ** -.35 * SR))
        modes = damped_modes(np.zeros(count, np.int64), 2 * np.pi * hz / SR, keep, height, size)
        # the brick rocks and touches twice more
        touches = sum(np.interp(t - late, t, modes, left=0) for late in rock_s * rng.random(2))
        weak = through(modes + from_db(rock_db) * touches, tub[:size])
        attack = 1 - np.exp(-t * ring_hz * 2)
        main = np.sin(2 * np.pi * ring_hz * t) * from_db(-60 * t / ring_t60) * attack
        knock = rms_one(weak) + from_db(ring_db) * rms_one(main)
        add(out, s, from_db(peak_db) * knock / np.abs(knock).max())
    return out


def clatter(clatter_db, thud_db, edge_db, dulling_db, tub, per_s=1450, clump_db=3.0, t60=0.024,
            wash_db=-9.5, calm_db=13.0, span_s=0.054):
    """A harder push makes more contacts; they clump as the heap gives way, over the liquid's wash."""
    # The hand moves on from tub to tub. Each row: start in seconds, crispness of its bricks in dB.
    tub_crispness = [(0, -1.5), (4.3, 4.5), (7.3, 4.5)]
    push_db = clatter_db + 36  # relative to a middling push
    rate = per_s * from_db(.5 * push_db + clump_db * drift(60))
    # loose, floating bricks ring longer than bricks pressed together
    ring_t60 = t60 * from_db(-.5 * np.clip(push_db, -22, 0))
    rings = evened(brick_rings(rate, ring_t60, spread_db=3.5, uneven_db=9.0), span_s=0.04)
    # as the hand eases off, the smooth wash and the rustle of the glove take over
    wash = from_db(wash_db + calm_db * np.clip(-push_db / 16, 0, 1)) * rng.standard_normal(N)
    heap = through(rings + wash, tub)
    thud = from_db(np.minimum(thud_db, -3) - 3.0) * evened(band(heap, 147, 360), span_s)
    # the hollow of the tub sounds with its floor and fades when the bricks only float
    hollow_db = -6.0 + 0.64 * np.clip(thud_db + 17.0, -12, 4) + 0.1 * np.clip(push_db, -18, 0)
    hollow = from_db(hollow_db) * evened(band(heap, 423, 814), span_s)
    body = from_db(-2.5) * evened(band(heap, 812, 1523), span_s)
    edge = from_db(edge_db - 3.5) * evened(band(heap, 1646, 2718, order=4), span_s)
    # the liquid swallows the highest modes first; bricks that break the surface keep them
    crisp_db = edge_db - 7.5 + np.clip(edge_db + 5.5, -14, 3) + 0.52 * np.clip(push_db, -10, 0)
    from_s, tub_db = np.transpose(tub_crispness)
    crisp_db += dulling_db + tub_db[np.searchsorted(from_s[1:], np.arange(N) / SR)]
    crisp = from_db(crisp_db) * evened(band(heap, 2474, 12000, order=4), span_s)
    return from_db(clatter_db) * (thud + hollow + body + edge + crisp)


def scene(afloat_thud_db=-17, afloat_top_db=-27):
    """The tub close to the microphone, its short echo and the garden behind, in mono."""
    clatter_db, thud_db, edge_db = hand()
    clear, slosh_change_db = glove_lifts()
    clatter_db = clatter_db + slosh_change_db + jams()
    # with the bricks afloat, the slosh loses its thud and its top
    thud_db = thud_db + afloat_thud_db * clear
    dulling_db = afloat_top_db * clear
    surface_db = clatter_db + edge_db + dulling_db
    tub = filled_tub()
    bricks = clatter(clatter_db, thud_db, edge_db, dulling_db, tub)
    bricks += clacks(surface_db, tub) + ticks(surface_db, tub) + knocks(tub)
    liquid = bubbles(clatter_db) + trickle() + spits() + fizz(clatter_db + dulling_db)
    close = table_echo(bricks + liquid + swishes())
    return (close + thin_tones() + still_air() + far_machine() + far_bird())[None]


def record(dry, low_cut_hz=105, high_cut_hz=15400, rumble_db=-97.0):
    """The small microphone loses the bass; a faint rumble lies beneath, and the top is cut steeply."""
    thin = signal.sosfilt(signal.butter(3, low_cut_hz, "high", fs=SR, output="sos"), dry)
    rumble = from_db(rumble_db) * rms_one(band(rng.standard_normal(N), 15, 90, order=2))
    return signal.sosfilt(signal.ellip(10, .1, 80, high_cut_hz, fs=SR, output="sos"), thin + rumble)


dry = scene()
out = record(dry)
file_out(out)
```